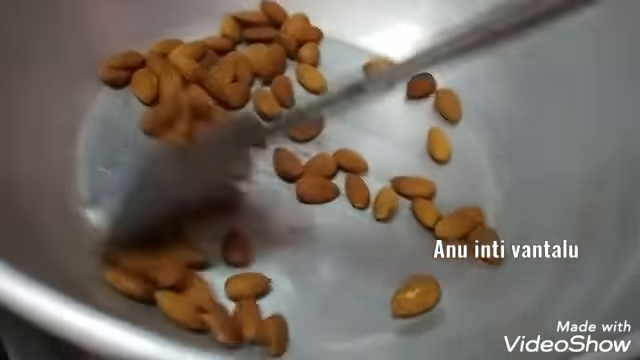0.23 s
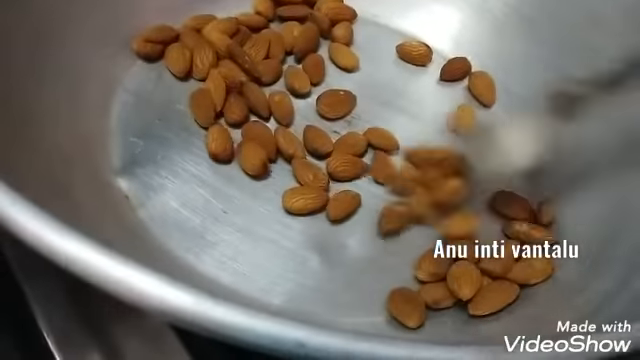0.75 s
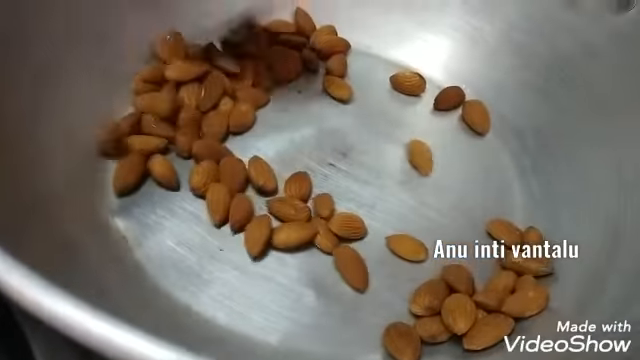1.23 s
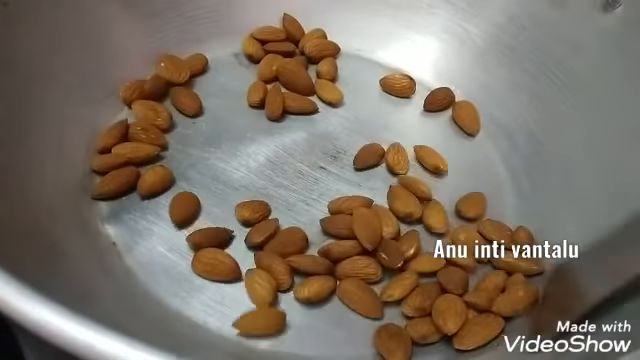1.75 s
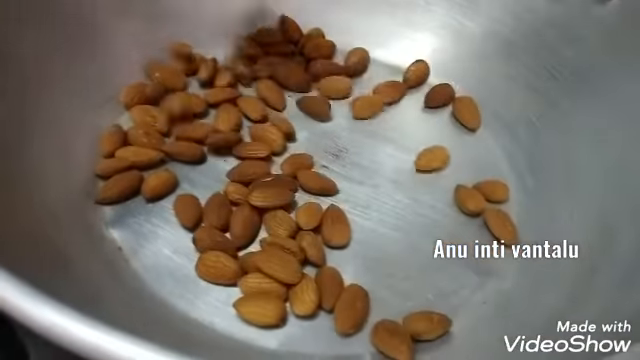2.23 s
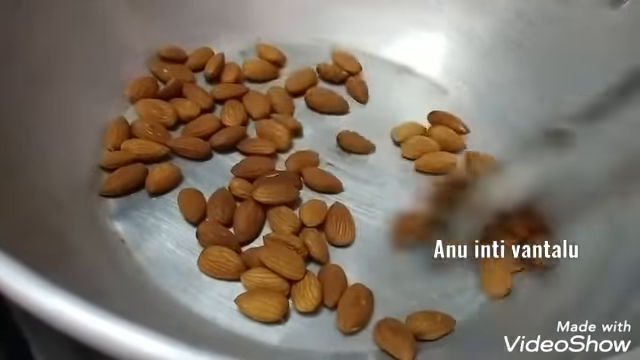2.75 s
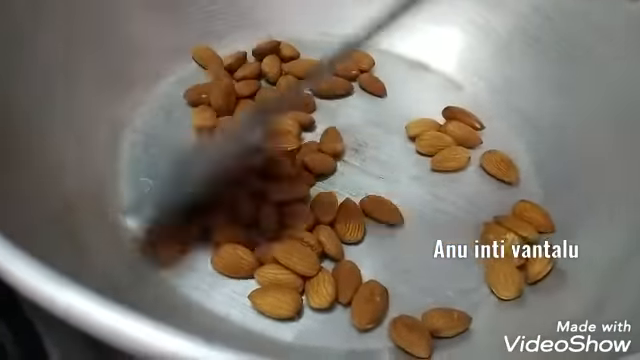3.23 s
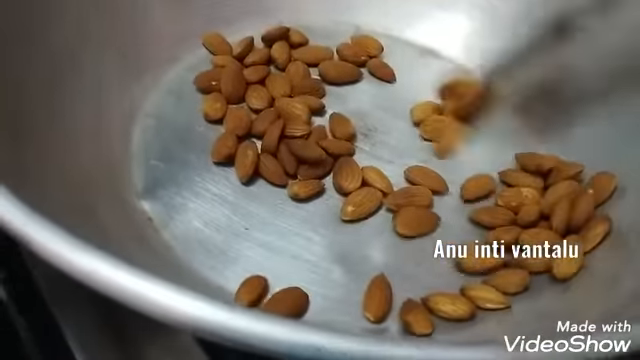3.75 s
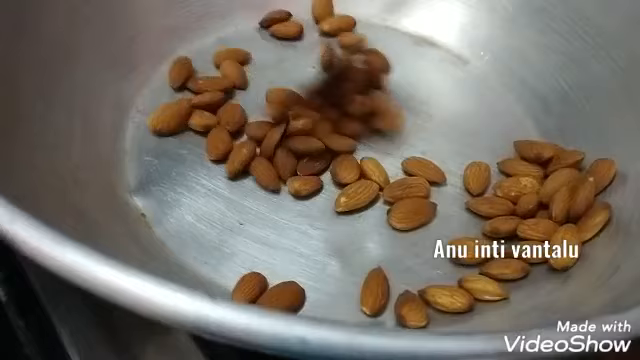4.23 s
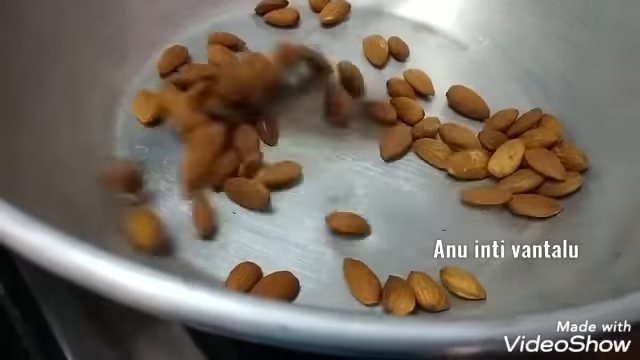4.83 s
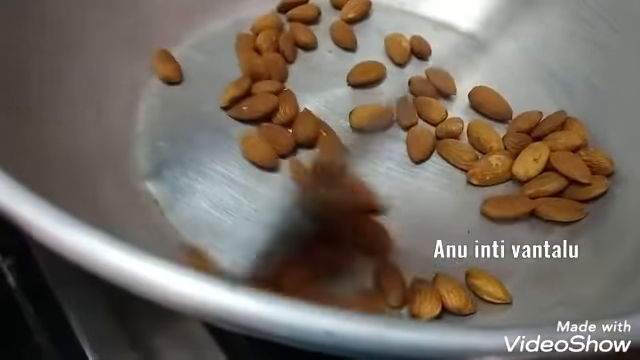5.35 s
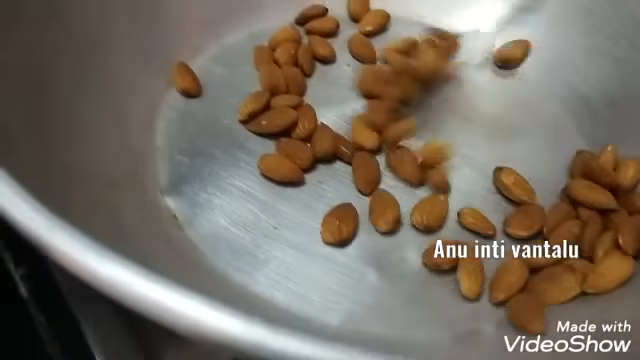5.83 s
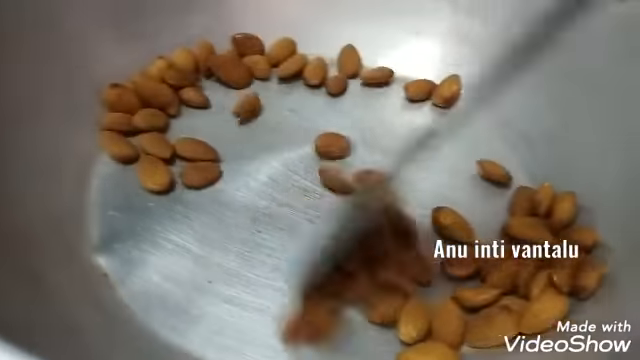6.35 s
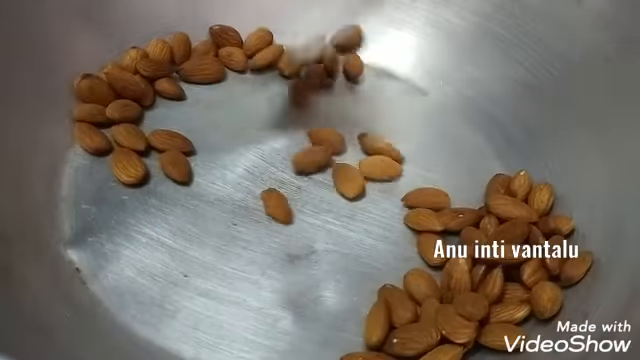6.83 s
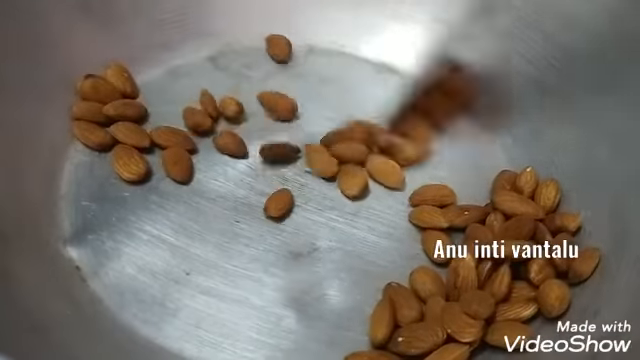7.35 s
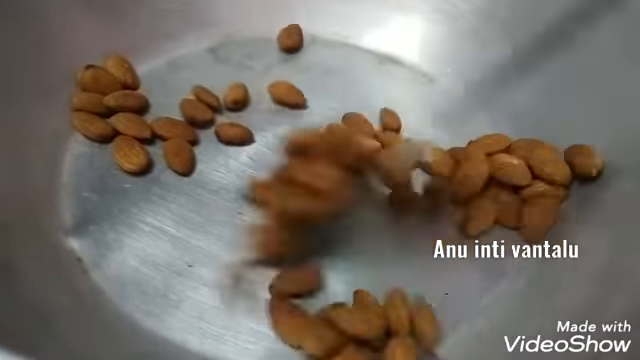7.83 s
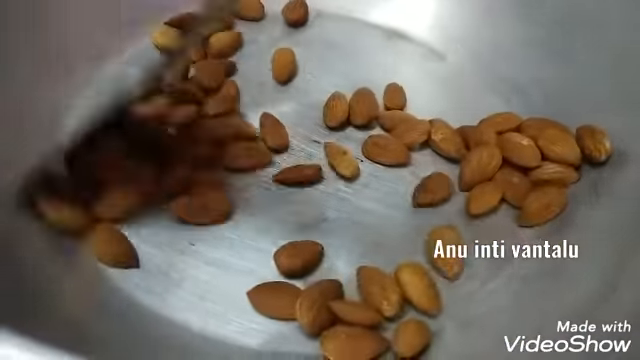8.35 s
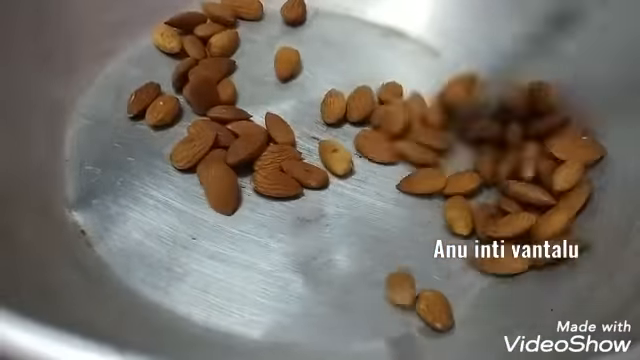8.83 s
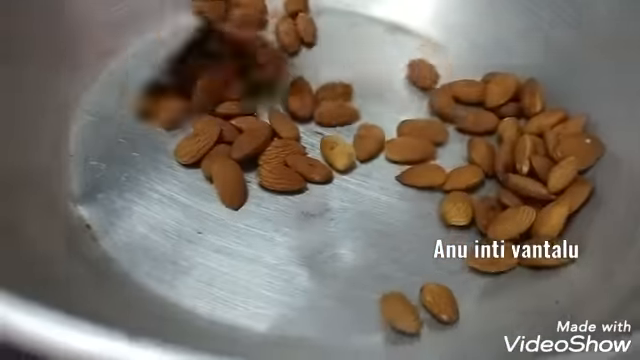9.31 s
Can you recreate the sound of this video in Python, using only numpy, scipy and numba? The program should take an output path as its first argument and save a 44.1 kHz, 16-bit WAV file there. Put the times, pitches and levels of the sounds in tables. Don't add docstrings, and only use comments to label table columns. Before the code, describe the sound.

A steel spatula pushes almonds around a thin metal pan. Each stroke starts with a soft thud or sharp bite of the edge, then a short scrape and a rattling spill of nuts that click and ring the metal. Strokes come irregularly, about one or two a second, with brief lulls. Close phone microphone in a small kitchen, short echo, very faint low hum.

```python
import sys
import numpy as np
from scipy import signal
from scipy.fft import rfft, irfft
from scipy.io import wavfile
from scipy.ndimage import uniform_filter1d
from numba import njit

SR = 44100
rng = np.random.default_rng(int(sys.argv[2]) if len(sys.argv) > 2 else 0)


def file_out(sig):
    cols = np.atleast_2d(sig).T
    lim = np.clip(cols, -1, 1)
    pcm = np.round(lim * 32767).astype(np.int16)
    wavfile.write(sys.argv[1], SR, pcm)


def boost(x):
    u = np.asarray(x, float) / 20
    return 10 ** u


N = 422478


def unit(x):
    return x / np.sqrt(np.mean(x ** 2) + 1e-20)


def along(points, hz):
    f, v = np.transpose(points)
    return np.interp(np.log(hz + 1), np.log(f + 1), v)


def wobble(rate, size=N):
    knots = np.clip(rng.standard_normal(int(N * rate / SR) + 2), -2, 2)
    return np.interp(np.linspace(0, N * rate / SR, size), np.arange(len(knots)), knots)


def coloured(x, spectrum):
    log_gain = np.log(boost(along(spectrum, np.fft.rfftfreq(4096, 1 / SR))) + 1e-6)
    cepstrum = irfft(log_gain)
    cepstrum[1:2048] *= 2
    cepstrum[2049:] = 0
    response = irfft(np.exp(rfft(cepstrum)))
    return signal.fftconvolve(x, response / np.linalg.norm(response))[:N]


def contacts(per_s, spread_db, slide):
    size = boost(spread_db * np.clip(rng.standard_normal(N), -2, 2))
    taps = (rng.random(N) < per_s / SR) * rng.choice([-1, 1], N) * size
    return np.sqrt(1 - slide) * unit(taps) + np.sqrt(slide) * rng.standard_normal(N)


def gestures(s, db, over_db, rise, fall):
    ms = np.arange(0, N / SR, .001)
    t = ms - s[:, None]
    swell = np.clip(1 + t / np.abs(rise)[:, None], 0, 1) ** 1.3615
    shape = swell * boost(-20 * np.maximum(t, 0) / np.abs(fall)[:, None])
    both = [np.sqrt(boost(level) ** 2 @ shape ** 2) for level in (db, db + over_db)]
    return [np.interp(np.arange(N) / SR, ms, gain) for gain in both]


@njit
def resonate(force, turn, fade, gain):
    out = np.zeros(len(force))
    for k in range(len(fade)):
        state = 0j
        for i in range(len(force)):
            push = 2 * (1 - fade[k]) * gain[k, i // 64] * force[i]
            state = state * turn[k, i // 64] * fade[k] + push
            out[i] += state.real
    return out


def ring(force, modes, roam_db, detune, between_db):
    hz, width, db = np.transpose(modes)[..., None]
    sign = (-1.) ** np.arange(len(modes))[:, None]
    roam = np.array([wobble(12, N // 64 + 1) for _ in modes])
    gain = sign * boost(db + roam_db * roam)
    pull = 1 + detune * np.array([wobble(7, N // 64 + 1) for _ in modes])
    turn = np.exp(2j * np.pi * hz * pull / SR)
    fade = np.exp(-np.pi * width[:, 0] / SR)
    return boost(between_db) * force + resonate(force, turn, fade, gain)


# (pitch [Hz], width [Hz], level [dB])
PAN_MODES = [(171.98, 16.1, -21), (223.6, 50.58, -14.5), (336.78, 21.19, -8.5), (432.92, 34.33, -11.5),
             (465.63, 33.51, -5.5), (573.88, 31.7, -2), (656.03, 22.7, -1), (767.62, 40.737, 1.5),
             (826.38, 63.35, -8.5), (898.16, 47.35, -5.5), (950.59, 31.2, -9), (1041.1, 48.11, -3.5),
             (1123.4, 64.68, -9.5), (1210, 43.64, -4), (1376.3, 92, -20), (1450, 44.98, -4.5),
             (1550.7, 77.4, -9), (1630, 28.25, 0), (1838.6, 113.65, -12), (1950, 71.34, -2.5),
             (2088, 82.2, -10), (2203.4, 27.05, -1), (2410, 61.77, -12.5), (2536.9, 51.11, -8),
             (2695.4, 99.66, -10), (2893.9, 35, -2), (3226.7, 39.2, -12.5)]
# (frequency [Hz], level [dB])
TUMBLE_COLOUR = [(100, -18), (250, -10), (450, -5.5), (800, 5.5), (1200, -5.5), (2000, -23.5),
                 (5000, -42.5), (10000, -80)]
# (frequency [Hz], level [dB])
RATTLE_COLOUR = [(300, -39.5), (700, -8), (1100, 6), (2500, -1.5), (3300, -11.5), (4200, -15.5),
                 (9000, -55.5), (12000, -80)]


def pan(tumble, rattle):
    dull, sharp = clicks()
    soft = tumble * boost(1.3 * wobble(55) + 0.5) * contacts(per_s=350, spread_db=4.0, slide=0.4105)
    hard = rattle * boost(1.4124 * wobble(55) + 2.5) * contacts(per_s=500, spread_db=3.5, slide=0.331)
    thrown = knocks()
    force = coloured(soft + dull, TUMBLE_COLOUR) + coloured(hard + sharp, RATTLE_COLOUR)
    force = force + boost(10.5) * thrown
    loaded = np.array(PAN_MODES) * [1, 1.2251, 1]
    ringing = ring(force, loaded, roam_db=4.0, detune=0.032, between_db=-12)
    return ringing + bumps() + boost(-4.5) * thrown


# (time [s], tumble [dB], rattle over tumble [dB], roll-out per 20 dB [s])
JOLTS = [(0.0, -35.5, 10, 0.2102), (.104, -21, -22, -0.0048), (0.419, -36.5, 6, 0.38),
         (.77, -31.5, 0, -0.0155), (.905, -25.5, -3, 0.4865), (.956, -23, -1, 0.4799),
         (1.453, -28.5, 6, 0.3493), (1.965, -33.5, 6.5, 0.9206), (2.449, -20, -2, 0.1438),
         (3.045, -23, -1, 0.11), (3.299, -29, -1, 0.4914), (3.939, -40.5, 14, 0.11),
         (4.03, -33.5, 12, 0.1823), (4.16, -30, 0, 0.0472), (4.287, -26, -3, 0.3651),
         (4.53, -23, -2.5, 0.1379), (4.831, -15.5, -2.5, 0.1504), (5.31, -29, 4, 0.2493),
         (5.96, -32.5, 9.5, 0.0271), (6.415, -29, 11, 0.2049), (6.49, -22.5, -2, 0.4508),
         (6.878, -28, -3, 0.0825), (7.322, -22.5, -1.5, 0.119), (7.385, -23, 3, 0.2056),
         (7.837, -23.5, -13, 0.1841), (8.342, -26.5, -10, 0.3732), (8.471, -30, 4, .5),
         (9.401, -19, -18, 0.0708), (9.46, -28.5, -2.5, 0.1769)]
# (fullest time [s], tumble [dB], rattle over tumble [dB], gathering [s], roll-out per 20 dB [s])
SWEEPS = [(.2, -19, -3.5, 0.1488, 0.0841), (.3, -35, -0.5, 0.0775, 0.2449),
          (2.56, -32, 9.5, 0.01303, -0.0255), (4.6, -27, -3.5, 0.0881, 0.0724),
          (.69, -29, -2, 0.1963, 0.09), (1.09, -28.5, 8, 0.1967, 0.1443), (1.25, -28, 5.5, 0.1322, 0.1705),
          (1.68, -28.5, 5.5, 0.237, 0.2172), (2.25, -23, 5, 0.30626, 0.114),
          (2.34, -28.5, 7, 0.308, 0.0153), (2.639, -32, 3.5, 0.2233, 0.2784),
          (2.94, -33, -2.5, 0.1941, 0.1247), (3.45, -38.5, 7, 0.1813, 1), (3.73, -32, -6, 0.5773, 0.2667),
          (4.48, -32.5, 7, 0.3565, 0.3519), (5.03, -21.5, 5, 0.1948, 0.2885),
          (5.12, -34, 13, 0.1807, 0.2718), (5.6, -28, 0, 0.1828, 0.36), (5.9, -34.5, 2, 0.1676, 0.6043),
          (6.11, -27, 3, 0.2376, 0.319), (7.07, -35.5, 0, 0.4507, 0.1261), (7.58, -29.5, 0, 0.3292, 0.1689),
          (7.699, -36, 0.5, 0.1578, -0.001), (8.12, -21.5, 6.5, 0.27088, 0.2785),
          (8.24, -32, 6.5, 0.185, 0.2194), (8.7, -31.5, -1, 0.4957, .5),
          (9.168, -30.5, 6.5, 0.29013, 0.1322), (9.58, -20.5, -17.5, 0.087, 3.7865)]


def nuts():
    jump_s = 0.02512
    jolts = [(s, db, over_db, jump_s, fall) for s, db, over_db, fall in JOLTS]
    return gestures(*np.transpose(jolts + SWEEPS))


# (time [s], peak [dB], sharp over dull [dB])
EARLY_CLICKS = [(0.113, -17.5, -20), (0.131, -11, -19.5), (0.149, -8.5, -21.5), (0.164, -14, -17),
                (0.174, -6, -16.5), (0.191, -8.5, -16), (0.208, -11.5, -4.5), (0.405, -23.5, -1.5),
                (0.894, -29, 3.5), (0.931, -18, -6), (1.003, -11.5, -2.5), (1.069, -11, -11.5),
                (1.098, -15, -5.5), (1.108, -15, -8), (1.157, -13.5, -8), (1.244, -14, 0.5),
                (1.316, -15.5, 9), (1.399, -25.5, -10), (1.481, -12, 4.5), (1.598, -17.5, 2),
                (1.628, -16.5, 4.5), (1.642, -17.5, 6.5), (1.707, -12.5, -4), (1.924, -22.5, -4),
                (1.963, -15.5, 0), (2.133, -16, 10.5), (2.165, -22.5, 1.5), (2.228, -12, -3),
                (2.247, -10.5, 2), (2.259, -13, -2.5), (2.314, -16, 1.5), (2.325, -12, -3),
                (2.624, -14.5, 2), (2.894, -27.5, 5), (3.02, -13.5, -5), (3.03, -14, 6.5),
                (3.055, -14.5, 3), (3.075, -15, -4.5), (3.112, -21.5, -2.5), (3.158, -23.5, 5.5),
                (3.233, -33.5, 0.5), (3.528, -24.5, -4), (3.61, -24, -1), (3.632, -20, -3),
                (3.645, -17.5, -3.5), (3.656, -20.5, -4), (3.666, -22, 0), (3.724, -24.5, -11),
                (3.735, -23.5, -5), (3.799, -18.5, -4), (3.881, -24, 0), (3.933, -17, 1),
                (4.005, -24.5, -6.5), (4.018, -18.5, -3), (4.151, -19, -1.5), (4.281, -7, -21.5)]
# (time [s], peak [dB], sharp over dull [dB])
LATER_CLICKS = [(4.29, -11, -20), (4.316, -13.5, -4.5), (4.417, -16.5, -2.5), (4.461, -19.5, -6.5),
                (4.48, -21, -11.5), (4.49, -24, -7.5), (4.519, -15.5, -2), (4.572, -16.5, -5.5),
                (4.628, -25, -9.5), (4.826, -6.5, -9.5), (4.87, -10.5, -4), (4.972, -13, 10),
                (4.998, -11, -3), (5.01, -8.5, -6.5), (5.021, -13.5, -16), (5.068, -17.5, 3),
                (5.123, -10, 10), (5.215, -17, 0.5), (5.374, -18.5, 2.5), (5.589, -18, 0),
                (5.677, -21.5, -1.5), (5.957, -17, -0.5), (6.073, -18.5, -18), (6.166, -19.5, -4),
                (6.218, -20, 0), (6.483, -12.5, -3), (6.683, -24, -10), (6.803, -24.5, -10),
                (6.82, -30, -11.5), (6.875, -20, -5.5), (7.121, -30.5, -5), (7.203, -32, -7.5),
                (7.455, -19, 2), (7.51, -17.5, -12), (7.841, -19, 4), (7.955, -11.5, -7),
                (8.033, -10.5, -1.5), (8.117, -9, -1), (8.218, -15.5, -2), (8.36, -17.5, -14.5),
                (8.41, -20.5, 0.5), (8.429, -24, -2), (8.534, -16, 0), (8.672, -19.5, -9.5),
                (8.827, -27, -3), (8.899, -32, -19.5), (9.03, -20.5, -7), (9.065, -19, -4.5),
                (9.138, -22.5, -7), (9.187, -17.5, -15), (9.2, -21, -8.5), (9.308, -21, -7),
                (9.385, -11, -26), (9.394, -15, -20), (9.445, -16.5, -12.5), (9.544, -20, -15)]


def clicks():
    s, db, sharp_db = np.transpose(EARLY_CLICKS + LATER_CLICKS)
    at = np.round(s * SR).astype(int)
    dull = np.bincount(at, boost(db + 15.5 - np.maximum(sharp_db, 0)), N)
    sharp = np.bincount(at, boost(db + 16 + np.minimum(sharp_db, 0)), N)
    return dull, sharp


def snaps():
    s, db, sharp_db = np.transpose(EARLY_CLICKS + LATER_CLICKS)[..., None]
    hz, _, level = np.transpose([mode for mode in PAN_MODES if mode[0] > 500])
    t = np.arange(SR // 20) / SR
    t60_s, rise_s, spot_db = 0.035, 0.0008, 5.0
    dull, sharp = (boost(level / 2 + along(colour, hz)) for colour in (TUMBLE_COLOUR, RATTLE_COLOUR))
    mix = boost(-np.maximum(sharp_db, 0)) * unit(dull) + boost(np.minimum(sharp_db, 0)) * unit(sharp)
    mix = mix * boost(spot_db * rng.standard_normal(mix.shape)) * rng.choice([-1, 1], mix.shape)
    rings = mix @ np.sin(2 * np.pi * hz[:, None] * t) * boost(-60 * t / t60_s) * np.tanh(t / rise_s)
    rings = boost(db - 2.0) * rings / np.abs(rings).max(axis=1, keepdims=True)
    at = np.round(s * SR).astype(int) + np.arange(len(t))
    return np.bincount(at.ravel(), rings.ravel(), N + SR)[:N]


# (time [s], peak [dB], pitch [Hz])
KNOCKS = [(0.94, -13, 1587), (1.048, -11, 1688), (1.2131, -11, 1617), (1.5508, -15, 1141),
          (1.6126, -9, 1210), (1.7057, -8.5, 1521), (1.923, -26, 1956), (1.9573, -19, 2410),
          (2.1803, -12, 1996), (2.549, -9, 1500), (8.09, -12, 1100), (8.14, -11, 1150), (3.33, -17, 3000),
          (4.318, -15, 2700), (3.02, -15.5, 2056), (3.7992, -16, 1240), (7.022, -16.5, 1074),
          (3.9403, -10, 1615), (4.016, -11, 1066), (4.0464, -8.5, 1065), (4.0941, -10.5, 1102),
          (4.5164, -11, 1071), (4.814, -10, 1854), (4.9559, -8, 1630), (5.7394, -15.5, 1618),
          (5.8347, -18, 1450), (6.112, -10.5, 1091), (6.4038, -14, 1898), (7.2931, -16, 2647),
          (7.376, -12, 1181), (7.545, -9.5, 1056), (8.473, -14.5, 2173), (8.6683, -13.5, 1950),
          (9.158, -11, 1074)]


def knocks():
    out, t = np.zeros(N + SR), np.arange(SR // 10) / SR
    for s, db, hz in KNOCKS:
        taps = boost(-60 * t / .07) * rng.standard_normal(len(t))
        taps[:6] += 3.5
        band = signal.butter(2, [0.7413 * hz, 1.2644 * hz], "band", fs=SR)
        flurry = signal.lfilter(*band, taps)
        out[round(s * SR):][:len(t)] += boost(db - 4.5) * flurry / np.abs(flurry).max()
    return out[:N]


# (time [s], peak [dB], depth [dB])
BUMPS = [(0.087, -4.5, -9), (.163, -4.5, -10.5), (0.94, -6.5, -40.5), (1.001, -14.5, -30.5),
         (1.044, -8, -45.5), (1.43, -10, -8.5), (1.954, -15, -20), (2.027, -13.5, -25.5), (2.43, -3, -19),
         (2.939, -24, -45.5), (3.281, -3.5, -9.5), (3.798, -21.5, -48), (3.929, -19.5, 2.5),
         (4.269, -2, -13), (4.414, -13.5, -26), (4.515, -8, -61.5), (4.812, -9, -14), (4.838, -6, -8.5),
         (5.944, -16.5, 0.5), (6.398, -14.5, -14.5), (6.455, -11.5, -27), (7.306, -3, -14.5),
         (7.375, -11.5, -14), (7.95, -18.5, -31), (8.114, -19, -16.5), (8.325, -3.5, -15),
         (8.571, -8, -33.5), (8.668, -14, -34), (9.383, -4, -7.5)]


def bumps():
    out, t = np.zeros(N + SR), np.arange(SR // 4) / SR
    hz, width, level = np.transpose(PAN_MODES)[..., None]
    fade = np.exp(-0.60915 * np.pi * width * t)
    modes = np.cos(2 * np.pi * hz * (t - .0017)) * fade * np.tanh((t / 0.0011855) ** 2)
    for s, db, depth_db in BUMPS:
        deep = (depth_db + 10.5) * np.clip(np.log2(620 / hz), 0, .9)
        share_db = level - 11 * (hz / 1000) ** 2 + deep
        share = boost(share_db + 4.239 * rng.standard_normal(hz.shape))
        thud = np.sum(share * modes, axis=0) / share.sum()
        out[round((s + .0012) * SR):][:len(t)] += boost(db + 1.5) * thud
    return signal.lfilter(*signal.butter(2, 130, "high", fs=SR), out[:N])


# (time [s], bite [dB], drag [dB], grit over drag [dB], easing per 20 dB [s])
BITES = [(0.088, -20, -37, -7, 0.2017), (0.404, -27.5, -41.5, -13, 0.2066), (0.9385, -20, -27, -19, 0.1427),
         (1.242, -11, -32, -27.5, 0.1578), (1.4327, -32, -41, -8.5, -0.1754),
         (1.954, -7.5, -23, -15.5, 0.1936), (2.3149, -12.5, -26.5, -22.5, 0.0687),
         (2.433, -19.5, -34.5, -16.5, 0.256), (2.679, -17, -29.5, -11.5, 0.2027),
         (3.0301, -24, -36, -19.5, 0.0113), (3.283, -21, -35, -13.5, .5), (3.93, -18, -29.5, -21.5, 0.0849),
         (4.15, -17.5, -47.5, -21.5, 0.5), (4.2716, -18.5, -37.5, -15, 0.2996),
         (4.811, -21, -27.5, -12.5, 0.1601), (5.163, -10, -28.5, -34.5, 0.0855),
         (5.302, -15.5, -28, -24.5, 0.0472), (5.9439, -26, -29.5, -16.5, 0.1201),
         (6.4766, -22, -45.5, -20, 0.3203), (6.8735, -12, -27.5, -16.5, 0.0518),
         (7.2929, -25.5, -35.5, -12.5, 0.396), (7.8384, -12.5, -39.5, -14, 0.48),
         (8.2242, -22, -28.5, -29.5, 0.4285), (9.3849, -26.5, -39.5, -8, -0.176)]
# (time [s], bite [dB])
TICKS = [(0.7577, -25.5), (1.044, -16.5), (1.003, -26), (1.21, -16.5), (2.55, -25), (4.316, -25),
         (8.281, -24), (4.87, -20), (3.357, -21.5), (5.281, -26), (5.6, -24.5), (1.483, -17),
         (1.7057, -28.5), (3.799, -24.5), (4.249, -26), (4.768, -17), (5.501, -28.5), (5.739, -29.5),
         (5.834, -35), (6.4069, -28), (6.645, -24), (7.821, -15.5), (8.41, -30.5), (9.2312, -35.5),
         (9.3013, -32.5)]
# (firmest time [s], drag [dB], pressing [s], easing per 20 dB [s])
SCRAPES = [(0.0, -40.5, 0.0501, -0.3042), (0.179, -31.5, 0.0983, 0.1685), (0.771, -44, 0.12585, 0.095),
           (1.6, -33.5, 0.2017, 0.1101), (2.942, -32.5, 0.06466, 0.0536), (3.41, -39, 0.1425, 0.3029),
           (4.525, -38, 0.0911, -0.009), (5.07, -36.5, 0.0722, 0.659), (5.61, -35, 0.07693, 0.2024),
           (7.581, -27, 0.2206, 0.0497), (7.87, -30, 0.05714, 0.4196), (7.99, -29, 0.0982, 0.0829),
           (8.721, -28, 0.3361, 0.1464), (9.45, -37.5, 0.0743, -0.0172)]
# (frequency [Hz], level [dB per Hz])
EDGE_COLOUR = [(1760, -16), (3000, -3), (3780, -11.5), (4940, -3.5), (5780, -12), (7870, -4.5), (8430, -3),
               (8740, -5.5), (9710, -12), (10500, -22), (13600, -46), (22000, -120)]
# (frequency [Hz], level [dB])
FIZZ_COLOUR = [(8500, -39), (10000, 6.5), (11500, 2), (13000, -6.5), (15500, -9.5), (15900, -42.5)]
# (pitch [Hz], width [Hz], level [dB])
BLADE_MODES = [(4527.2, 56, -21.5), (4849.5, 170, -5), (5866.8, 463, -11.5), (7636.6, 504.2, -9),
               (8275.4, 353.4, -14)]


def blade(rattle):
    grip_s, pressed_grit_db, bite_t60_s = 0.01912, -16.5, 0.086585
    drags = [(s + grip_s, db, over_db, grip_s, fall) for s, _, db, over_db, fall in BITES]
    presses = [(s, db, pressed_grit_db, rise, fall) for s, db, rise, fall in SCRAPES]
    drag, sand = gestures(*np.transpose(drags + presses))
    chatter, t = boost(3.377 * wobble(45)), np.arange(SR // 3) / SR
    bite = np.zeros(N + SR)
    for s, db, *_ in BITES + TICKS:
        fade = boost(db - 6.5 - 60 * t / bite_t60_s)
        bite[round(s * SR):][:len(t)] += fade * (1 - np.exp(-t / 0.0011203))
    bite = bite[:N]
    pressure = np.hypot(chatter * np.hypot(drag, boost(-24) * rattle), bite)
    grains = coloured(contacts(per_s=3000, spread_db=4.0, slide=0.5557) * pressure, EDGE_COLOUR)
    grit = np.hypot(boost(5.147 * wobble(70)) * np.hypot(sand, boost(-46.5) * rattle), boost(-21.5) * bite)
    fizz = coloured(contacts(per_s=3700, spread_db=-1.5, slide=0.63) * grit, FIZZ_COLOUR)
    ringing = ring(grains, BLADE_MODES, roam_db=4.5, detune=0.05253, between_db=-3)
    return ringing + fizz + sings()


# (time [s], pitch [Hz], level [dB], time to fade by 60 dB [s])
SINGS = [(7.835, 2200, -28, 0.454), (7.83, 3200, -45, 0.317), (7.82, 4290, -35, 0.5835),
         (2.89, 2100, -28, 0.1442), (9.455, 2560, -30, 0.1798), (.14, 4750, -33, 0.2592),
         (5.165, 4400, -23.5, 0.1042), (1.96, 2540, -23.5, .2), (1.96, 9400, -25, .15),
         (1.96, 8400, -29.5, .15), (6.877, 4600, -32, 0.1318), (6.877, 3250, -34, 0.1665),
         (8, 4750, -32, 0.124), (7.3, 2890, -27, 0.1541), (7.5, 5300, -36, 0.449),
         (7.36, 3220, -40.5, 0.3765), (7.84, 5250, -30, 0.255), (.31, 3220, -40.5, 0.2415),
         (6.41, 2100, -25, 0.2372)]


def sings():
    out, t = np.zeros(N + SR), np.arange(SR // 4) / SR
    for s, hz, db, t60 in SINGS:
        wander = np.cumsum(0.0733 * rng.standard_normal(len(t)))
        tone = np.sin(2 * np.pi * hz * t + wander)
        out[round(s * SR):][:len(t)] += boost(db - 60 * t / t60) * np.tanh(t / 0.0047) * tone
    return out[:N] * boost(4.36 * wobble(120))


# (frequency [Hz], time to fade by 60 dB [s])
WALLS = [(200, 0.5828), (2000, 0.14935), (10000, 0.11527)]


def walls(x):
    hz, t, z = signal.stft(rng.standard_normal(SR // 2), SR, nperseg=256)
    fade = boost(-60 * t / along(WALLS, hz)[:, None])
    tail = signal.istft(z * fade, SR, nperseg=256)[1]
    return signal.fftconvolve(np.pad(x, (200, 0)), tail / np.linalg.norm(tail))[:N]


# (time [s], level [dB])
HUM = [
    (0.0, -66.5),
    (1.09, -59.5),
    (1.7, -60.5),
    (2.96, -73),
    (5.02, -71),
    (6.85, -70.5),
    (6.95, -61),
    (7.3, -57.5),
    (7.4, -69),
    (9.58, -74.5),
]
# (frequency [Hz], level [dB per Hz])
AIR_COLOUR = [(18, -45), (30, -32), (102, -4), (212, -13), (781, 8), (2130, -4), (8660, -63.5), (9820, -51),
              (12000, -42), (15600, -79), (22000, -120)]


def kitchen():
    turn = 2 * np.pi * np.cumsum(95 + 2.39 * wobble(16)) / SR
    s, db = np.transpose(HUM)
    level = np.interp(np.arange(N) / SR, s, db)
    hum = boost(level + 7.0 + 3.8 * wobble(8.2)) * np.sin(turn)
    return hum + boost(-49.0) * coloured(rng.standard_normal(N), AIR_COLOUR)


def scene():
    tumble, rattle = nuts()
    near = pan(tumble, rattle) + blade(rattle) + snaps()
    return (near + boost(-10) * walls(near) + kitchen())[None]


# (frequency [Hz], level [dB])
PHONE_COLOUR = [(20, -23), (70, -8), (130, -0.5), (7800, 2.5), (7930, -14.5), (8060, -0.5), (15800, 0.5),
                (16400, -50.5)]


def microphone(x):
    return coloured(x, PHONE_COLOUR)


# (frequency [Hz], level [dB])
MASK = [(3000, -68), (8800, -56.5), (9700, -34), (11500, -34.5), (12300, -37.5), (12400, -47)]


def thinned(x):
    hz, _, z = signal.stft(x, SR, nperseg=2048)
    power, hz = np.abs(z[:-1]) ** 2, hz[:-1, None]
    bands = power.reshape(64, 16, -1).mean(axis=1)
    luck = uniform_filter1d(rng.standard_normal((64, z.shape[1])), size=2, axis=1)
    bands[36:], luck[36:] = bands[36:45].mean(axis=0), .8 * luck[36] + .6 * luck[36:]
    band = np.repeat(bands, 16, axis=0)
    least = band.max(axis=0) * boost(along(MASK, hz) + 12 * np.repeat(luck, 16, axis=0)) ** 2
    coarse = band * (hz > 9500) * np.where(hz < 12400, 1.4, 0.8)
    weakest = np.maximum(0.6 * least * (hz < 12400), coarse)
    keep = (band > least) & (power > weakest)
    return signal.istft(z * np.pad(keep, ((0, 1), (0, 0))), SR, nperseg=2048)[1][:N]


def roll_off(x):
    return signal.sosfilt(signal.butter(12, 16490, fs=SR, output="sos"), x)


def record(dry):
    heard = thinned(microphone(dry[0]))[None]
    return roll_off(heard)


dry = scene()
out = record(dry)
file_out(out)
```